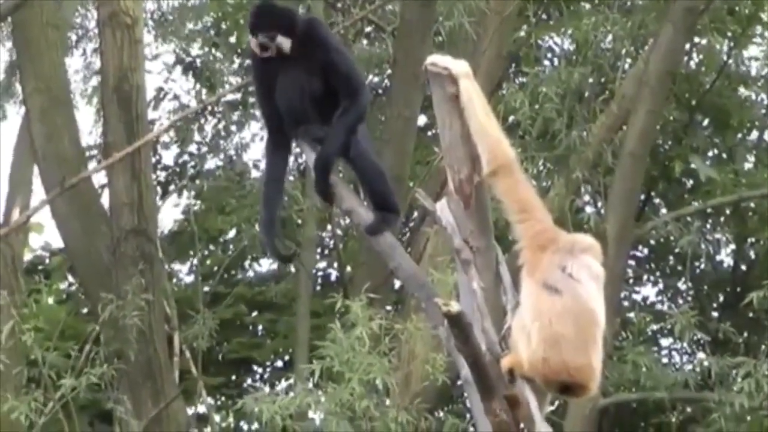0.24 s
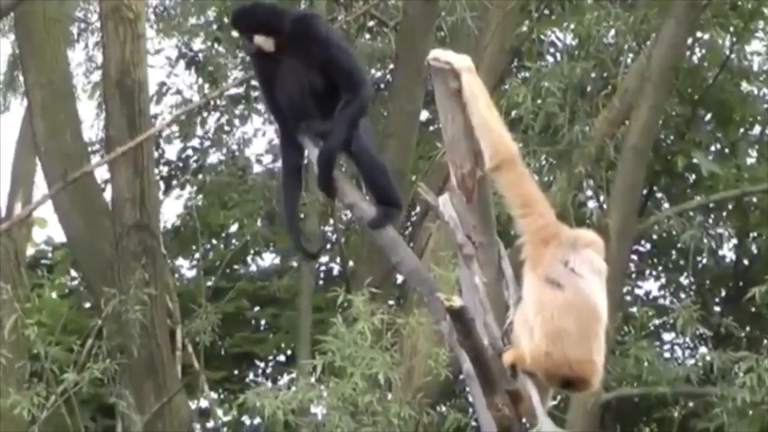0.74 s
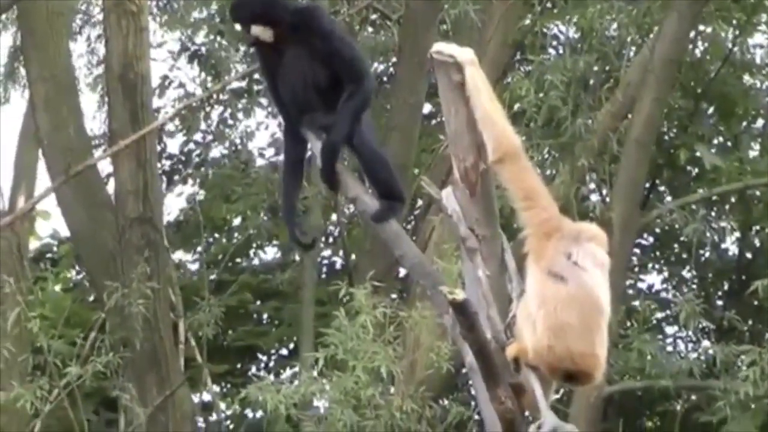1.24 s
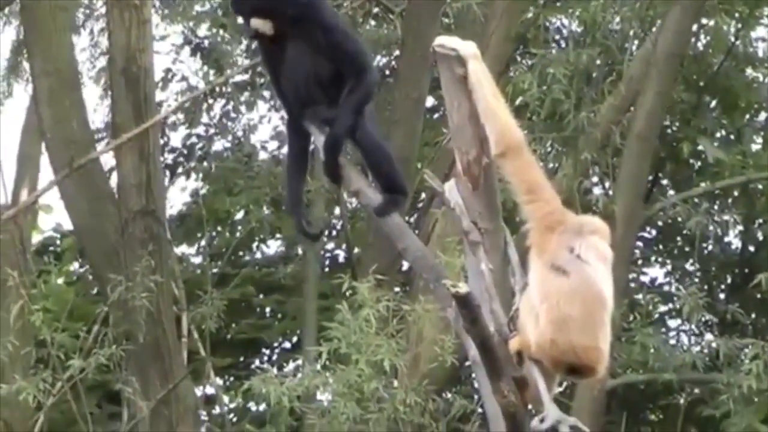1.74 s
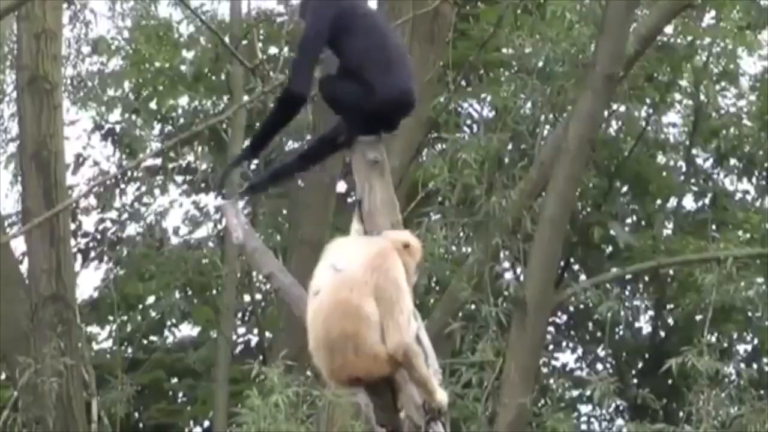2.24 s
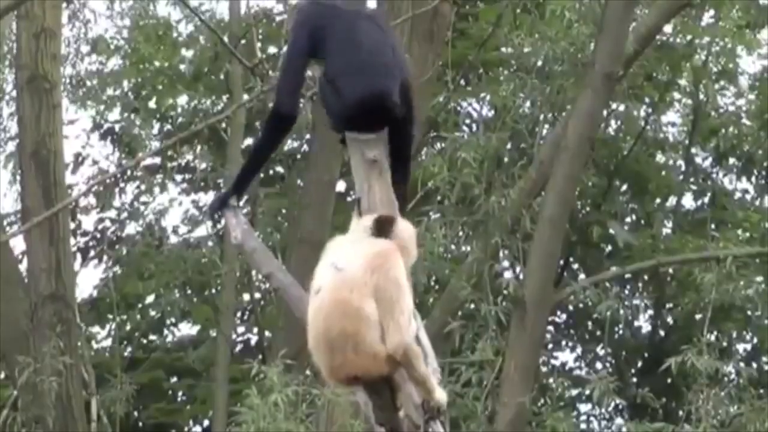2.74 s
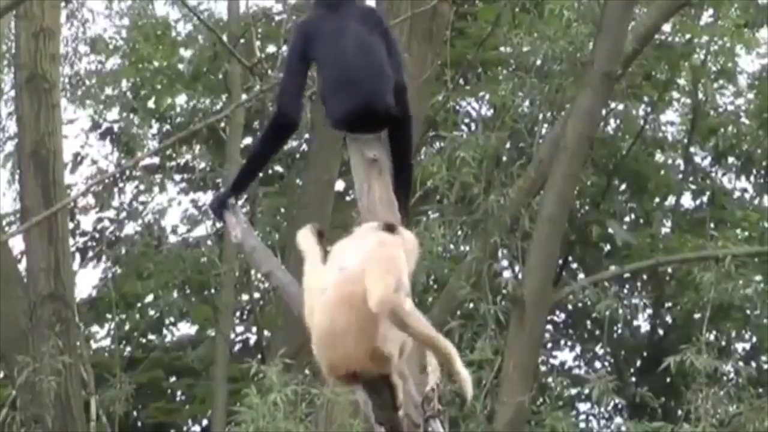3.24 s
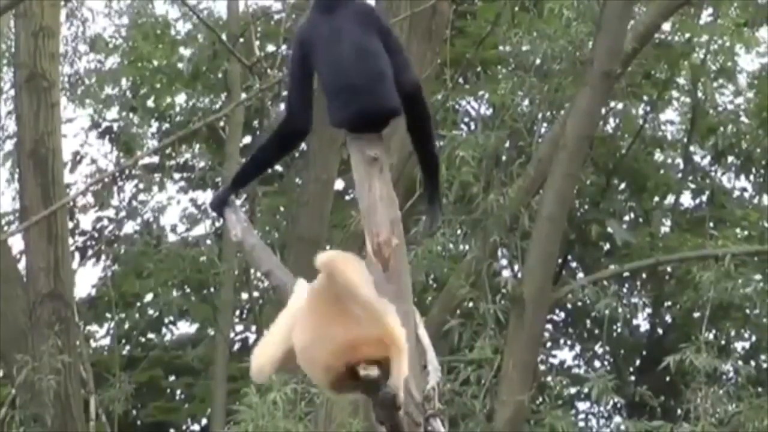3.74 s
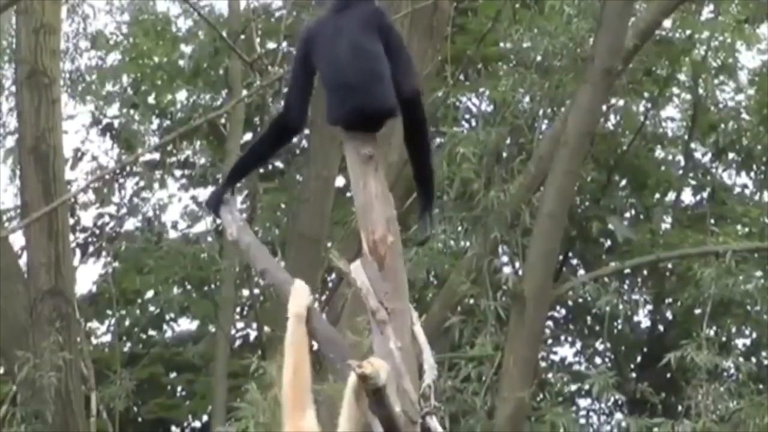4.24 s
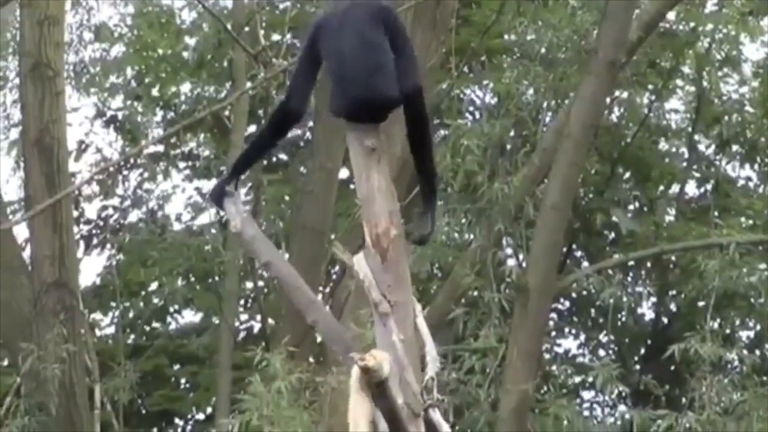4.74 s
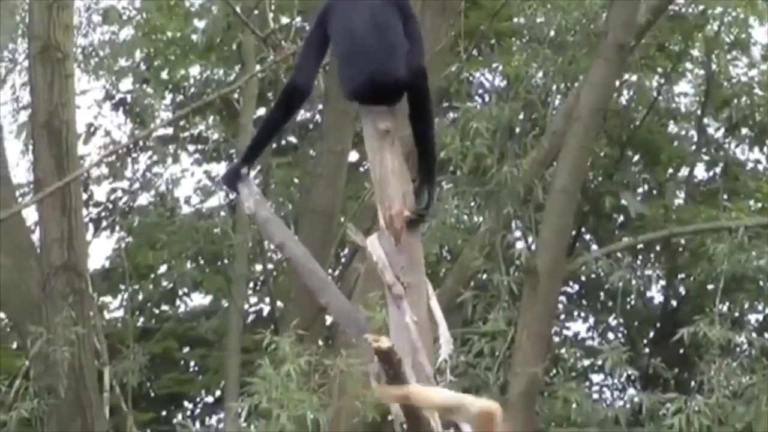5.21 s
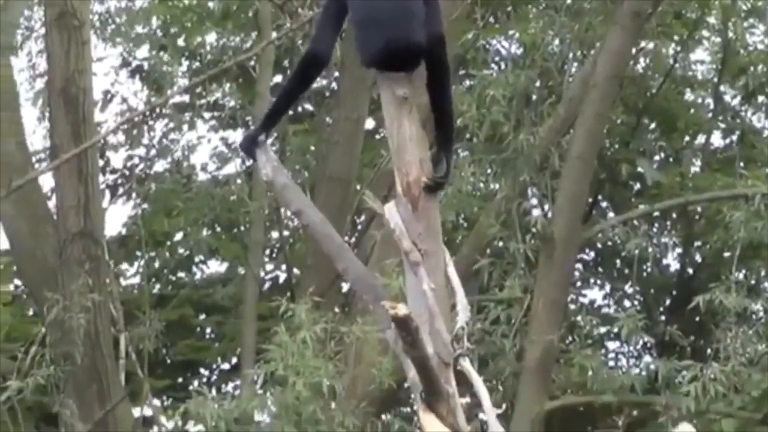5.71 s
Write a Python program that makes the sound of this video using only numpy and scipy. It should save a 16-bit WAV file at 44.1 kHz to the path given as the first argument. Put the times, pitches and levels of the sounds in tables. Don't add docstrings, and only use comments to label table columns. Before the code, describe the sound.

In a wooded outdoor enclosure, a high gibbon finishes one whistled note, slides up through another, then pauses. A thin bird trill buzzes past, branches knock and crack, leaves rustle. A long swelling note follows, droops and flips abruptly upward. A last steady note joins a low rising whoop. Motor hum, leaf hiss and light wind lie behind, heard by a handheld stereo camera microphone.

```python
import sys
import numpy as np
from scipy import signal
from scipy.fft import rfft, irfft
from scipy.io import wavfile
from scipy.ndimage import uniform_filter1d

SR = 44100
rng = np.random.default_rng(int(sys.argv[2]) if len(sys.argv) > 2 else 0)


def dump_mix(stems):
    frames = np.atleast_2d(stems).T
    limited = np.clip(frames, -1, 1)
    pcm = np.round(limited * 32767).astype(np.int16)
    wavfile.write(sys.argv[1], SR, pcm)


def attenuation_scalar(level_db):
    decades = np.asarray(level_db, float) / 20
    return 10 ** decades


N = 263277
LEAD_S = .4
T = np.arange(-int(LEAD_S * SR), N) / SR

# time in seconds, gain in dB.
BACKGROUND_SWELL = [
    (0.0, -6.5),
    (0.15, -3),
    (0.4, 1.3),
    (1.6, 0.4),
    (3.1, 2.7),
    (3.7, 1.4),
    (4.5, -5),
    (4.75, -5.5),
    (5.4, 1.2),
    (5.97, 1),
]


def colour(points, hz):
    p = np.array(points)
    return attenuation_scalar(np.interp(np.log(np.maximum(hz, 1)), np.log(p[:, 0]), p[:, 1]))


def curve(points):
    s, *cols = np.transpose(points)
    return np.array([np.interp(T, s, c) for c in cols])


def tent(s, half_s):
    return np.clip(1 - abs(T - s) / half_s, 0, 1)


def gate(start, end, fade_s=0.0029):
    opening = np.clip((T - start) / fade_s, 0, 1)
    closing = np.clip((end + fade_s - T) / fade_s, 0, 1)
    return opening * closing


def walk(rate):
    steps = rng.standard_normal(int(len(T) / SR * 60) + 2)
    w = np.interp(T - T[0], np.arange(len(steps)) / rate, steps)
    w = uniform_filter1d(w, int(SR / rate))
    return w / w.std()


def band(x, lo_hz, hi_hz):
    sos = signal.butter(2, [lo_hz, min(hi_hz, .45 * SR)], "band", fs=SR, output="sos")
    return signal.sosfilt(sos, x)


def wind():
    # gust centre in seconds, peak level in dB, half width in seconds.
    gusts = [
        (0.63, -60, 0.37),
        (1.15, -74, .15),
        (3.76, -76, .15),
        (4.08, -57.5, .2),
        (4.87, -62.5, 0.33),
        (5.45, -56, 0.16),
        (5.92, -63, 0.28),
    ]
    calm_db = -86
    puff = band(rng.standard_normal((2, len(T))), 12, 42)
    gust_db = np.max([(db - calm_db) * tent(s, half_s) for s, db, half_s in gusts], axis=0)
    return puff / puff.std() * attenuation_scalar(calm_db + gust_db + 10.0 + 5.8 * walk(2.4))


def motor(hz=70.23):
    # multiple of the motor rate, level in dB.
    multiples = [
        (1, 2),
        (3, -4),
        (4, -3.5),
    ]
    # time in seconds, motor load in dB.
    load = [(0.0, 1.7), (0.95, 1), (1.96, 0.5), (2.06, -3), (3.11, -6.5), (3.3, -1), (3.6, -2), (3.8, -6),
            (4.4, -7), (4.85, -5), (5.3, -2.5), (5.45, -13), (5.97, -7)]
    hum_db, octave_db, octave_per_load = -54.5, -75.5, 1.44
    gain_db, load_db = curve(BACKGROUND_SWELL)[0], curve(load)[0]
    phase = 2 * np.pi * np.cumsum(hz * (1 + 0.0057 * walk(4))) / SR
    tones = sum(attenuation_scalar(g + walk(7)) * np.sin(k * phase) for k, g in multiples)
    hum = attenuation_scalar(hum_db + gain_db + load_db - 3.0) * tones
    octave_level_db = octave_db + gain_db - octave_per_load * load_db + 3.5 * walk(2.4)
    hum += attenuation_scalar(octave_level_db) * np.sin(2 * phase)
    return hum * attenuation_scalar(np.array([[1.3], [-1.3]]))


def wood():
    # frequency in Hz, density in dB per Hz.
    rumble = [(26, -37.5), (45, -24), (70, -14.5), (162, -19.5), (210, -10), (246, -18.5), (280, -11),
              (712, -16), (909, -25), (1400, -22.5), (1820, -20), (3080, -120)]
    # frequency in Hz, density in dB per Hz.
    leaves = [(700, -23), (1300, -9.5), (2100, 2.5), (2900, 0.5), (3700, -7), (4400, -1), (5300, 2),
              (6300, -5), (7200, -10), (8600, -9.5), (9800, -4), (12000, -10.5), (15000, -9.5)]
    # frequency in Hz, side minus mid in dB.
    wood_side = [(60, -7), (110, -15), (200, -10.5), (380, -19.5), (690, -11), (1270, -2.5), (2340, -7),
                 (4320, -14), (7960, -26), (14700, -38.5)]
    # frequency in Hz, left minus right in dB.
    wood_lean = [(60, 4.5), (110, 3), (200, 3), (380, 1.5), (690, 1), (1270, -1), (2340, -0.5), (4320, -1),
                 (7960, 3), (14700, -4)]
    rumble_db, hiss_db, hiss_follows = -53.5, -69, 0.53
    gain_db = curve(BACKGROUND_SWELL)[0]
    low_db = rumble_db + gain_db
    high_db = hiss_db + hiss_follows * gain_db

    hz = np.fft.rfftfreq(len(T), 1 / SR)
    spectrum = np.hypot(colour(rumble, hz), attenuation_scalar(-19.0) * colour(leaves, hz))
    mid, side = rfft(rng.standard_normal((2, len(T)))) * spectrum
    side = side * colour(wood_side, hz)
    lean = np.sqrt(colour(wood_lean, hz))
    pair = np.array([(mid + side) * lean, (mid - side) / lean])

    out = 0
    for octave in range(10):
        centre = 25 * 2. ** octave
        slot = np.clip(1 - abs(np.log2(np.maximum(hz, 1) / centre)), 0, 1)
        hiss_share = np.clip(np.log2(centre / 400) / 2.73, 0, 1)
        db = (1 - hiss_share) * low_db + hiss_share * (high_db + 8.5)
        flicker_db = .6 * walk(6) + .7 * walk(25)
        out = out + attenuation_scalar(db + flicker_db) * irfft(pair * slot, len(T))
    return out * attenuation_scalar(28)


def bird(trill_hz=45, depth=.065):
    # swell centre in seconds, peak level in dB.
    swells = [
        (1.285, -64),
        (1.33, -60),
        (1.475, -57.5),
        (1.609, -59),
        (1.69, -67),
    ]
    start, end = 1.26, 1.75
    top_hz, slide_in_hz, slide_out_hz, slide_s = 7900, 1000, 400, .065
    fade_db_per_s = 300
    hz = top_hz - slide_in_hz * tent(start, slide_s) - slide_out_hz * tent(end, slide_s)
    db = np.max([peak_db - fade_db_per_s * abs(T - s) for s, peak_db in swells], axis=0)
    beat = np.sin(2 * np.pi * trill_hz * T + 1.7 * walk(26))
    swoop = hz * (1.015 - depth * ((1 + beat) / 2) ** 2 + 0.0096 * walk(60))
    return gate(start, end) * attenuation_scalar(db - beat) * np.sin(2 * np.pi * np.cumsum(swoop) / SR)


def branches():
    # start in seconds, peak level in dB, centre frequency in Hz.
    ticks = [
        (1.1694, -50, 1500),
        (2.111, -56, 2300),
        (2.6697, -48, 2310),
        (3.09, -42.5, 5110),
        (3.1176, -32, 1990),
        (3.1376, -45, 5300),
        (3.4697, -42, 1620),
    ]
    # start in seconds, peak level in dB, ring frequency in Hz.
    knocks = [
        (2.039, -55, 1060),
        (3.018, -70, 450),
        (3.047, -43, 420),
        (3.28, -50, 377),
    ]
    # start in seconds, peak level in dB, ring frequency in Hz.
    chip = (.4, -54, 5500)
    out, t = np.zeros(len(T)), np.arange(2000) / SR
    for s, db, hz in ticks:
        decay = np.exp(-t / .0006) + .25 * np.exp(-t / .004)
        burst = band(rng.standard_normal(len(t)) * decay, hz / 3, hz * 2.5)
        i = int((s - T[0]) * SR)
        out[i:i + len(t)] += attenuation_scalar(db) * burst / abs(burst).max()
    for s, db, hz in [*knocks, chip]:
        i = int((s - T[0]) * SR)
        swell = (t / 0.0051) * np.exp(1 - t / 0.0051)
        out[i:i + len(t)] += attenuation_scalar(db) * swell * np.sin(2 * np.pi * hz * t)
    return out


def rustle():
    # start in seconds, level in dB, fade in seconds.
    shakes = [
        (3.12, -68, .05),
        (3.462, -53.5, 0.11),
        (3.59, -66, .05),
    ]
    shake = 0
    for s, db, fade_s in shakes:
        onset = np.clip((T - s) / .012, 0, 1)
        shake = shake + attenuation_scalar(db) * onset * np.exp(-np.maximum(T - s, 0) / fade_s)
    grain = attenuation_scalar(2.5 * walk(80))
    return shake * grain * band(rng.standard_normal(len(T)), 4200, 13000)


def trunks(x, rise_s=0.0019, t60_low=0.93, t60_mid=0.45, t60_high=0.68, side_db=-8.0):
    t = np.arange(int(1.3 * SR)) / SR
    first_s = .036
    rise = np.clip((t - first_s) / rise_s, 0, 1)
    noise = rng.standard_normal((2, len(t)))
    low = band(noise, 140, 1640) * attenuation_scalar(-60 * t / t60_low)
    middle = band(noise, 2790, 2800) * attenuation_scalar(-60 * t / t60_mid + 8.0)
    high = np.clip(t / 0.021, 0, 1) * band(noise, 3300, 10400) * attenuation_scalar(-60 * t / t60_high + 10.5)
    rise += 0.97 * np.exp(-((t - .042) / 0.003) ** 2)
    rise += 0.85 * np.exp(-((t - .075) / 0.0095) ** 2)
    cloud = low * rise + middle * rise + high
    mid, side = cloud / np.sqrt(SR * 0.059) * [[1], [attenuation_scalar(side_db)]]
    side = band(side, 100, 3500)
    return signal.fftconvolve(x[None], [mid + side, mid - side], axes=1)[:, :len(x)]


def limbs(x, fade_s=0.021):
    t = np.arange(1200) / SR
    shape = np.clip(t / 0.0028, 0, 1) * np.exp(-t / fade_s) / np.sqrt(SR * 0.0057)
    mid, side = rng.standard_normal((2, len(t))) * shape
    side = 0.43 * band(side, 200, 3000)
    return signal.fftconvolve(x[None], [mid + side, mid - side], axes=1)[:, :len(x)]


def whoop():
    # time in seconds, pitch in Hz, level in dB.
    glide = [
        (5.45, 409.4, -68),
        (5.48, 414, -58),
        (5.6, 435.5, -57.5),
        (5.681, 423, -44.5),
        (5.76, 501.4, -51.5),
        (5.854, 595, -36),
        (5.97, 679, -39.5),
    ]
    s, hz, db = np.transpose(glide)
    smooth_hz = uniform_filter1d(np.interp(T, s, hz), size=1500)
    phase = 2 * np.pi * np.cumsum(smooth_hz) / SR
    level = attenuation_scalar(np.interp(T, s, db) + 2.5) * gate(s[0], s[-1])
    return level * (np.sin(phase) + attenuation_scalar(-36.0) * np.sin(2 * phase))


def pitch():
    # time in seconds, pitch in Hz.
    pitch_first = [(0, 1486), (.04, 1497), (.07, 1530), (.1, 1600), (.13, 1670), (.16, 1680), (.21, 1660)]
    pitch_rise = [(.41, 1190), (.44, 1250), (.47, 1300), (.5, 1328), (.55, 1318), (.67, 1352), (.72, 1418),
                  (.76, 1490), (.83, 1650)]
    pitch_blip = [(2.18, 1530), (2.23, 1546), (2.252, 1570), (2.265, 1700), (2.3, 1800)]
    pitch_hold = [(3.36, 1520), (3.42, 1590), (3.5, 1610), (3.55, 1650), (3.7, 1706), (3.91, 1742),
                  (4.09, 1713), (4.17, 1726), (4.3, 1723)]
    pitch_last = [(5.39, 1190), (5.41, 1240), (5.44, 1310), (5.48, 1328), (5.59, 1316), (5.69, 1322),
                  (5.84, 1321), (5.97, 1350)]
    droop_hz_per_s = 380
    sag_at_s, sag_from_hz, rest_hz, sag_s = 4.42, 1683, 850, .344
    leap_at_s, leap_s, leap_top_hz = 5.08, .009, 3300
    hz = curve(pitch_first + pitch_rise + pitch_blip + pitch_hold + pitch_last)[0]
    held_s, held_hz = pitch_hold[-1]
    sag = rest_hz + (sag_from_hz - rest_hz) * np.exp(-(T - sag_at_s) / sag_s)
    sag = np.minimum(sag, held_hz - droop_hz_per_s * (T - held_s))
    leap_share = .5 + .5 * np.tanh((T - leap_at_s) / leap_s / 2)
    leap = sag * (leap_top_hz / sag) ** leap_share
    in_fall = (T > held_s) & (T < pitch_last[0][0] - .1)
    return uniform_filter1d(np.where(in_fall, leap, hz), size=400)


def gibbon(note, phase, hz, tilt_db, third_db, fifth_db, octave_db, beam=1.4, muffle_db=1.6):
    # time in seconds, turned left in dB, turned to the microphone in dB.
    head = [(.016, 5.5, 4), (.08, 5, 4.5), (.2, 5, -30), (.44, -1, 3.2), (.52, -5.5, 5.3), (.62, -5, 6.8),
            (.72, 3, 0.8), (2.24, 7, 2), (3.5, -4, 0.9), (3.7, 5.5, 0), (4.4, 7.5, -1.8), (4.5, 3.5, -1),
            (4.93, -2, -4.5), (5.052, 3, 3), (5.078, 0.1, -7.5), (5.41, 3, 0.6), (5.8, 20, -2.9),
            (5.88, -11.5, 2.1)]
    # centre in seconds, depth in dB, half width in seconds.
    fades = [(3.52, 25, 0.017), (4.4, 16, 0.0079), (2.7, -3, 0.013), (3.734, 10, 0.033), (3.82, 6.5, 0.047),
             (3.885, 1.5, 0.039), (4.0, -2.5, .035), (4.04, 7, .02), (2.7, -2.5, 0.077),
             (3.595, -4.5, 0.026), (5.8, -6, 0.0063), (4.073, 16, 0.029), (4.29, 9, 0.011),
             (4.368, 11, 0.015), (4.41, 11, .02), (4.7, -6, 0.061), (.72, 6, 0.008), (5.47, 3, 0.023),
             (4.503, 8, 0.036), (5.883, 11, 0.054)]
    # frequency in Hz, gain in dB.
    throat = [(2800, -30), (3500, -19), (4200, -9.5), (5200, -6), (6000, -11), (6700, -14.5), (7900, -15.5),
              (9200, -17), (10400, -18.5), (12000, -23.5), (14000, -30), (15500, -37)]
    # frequency in Hz, gain in dB.
    octave_throat = [(2000, 0.5), (2300, -5.5), (2650, -12.5), (2900, -23.5), (3100, -25.5), (3450, -27),
                     (4000, -65)]
    mouth_on_octave = .2
    top_loss_db = 9

    moves = np.vstack([curve(note), curve(head)])
    effort_db, mouth_db, pan_db, face_db = uniform_filter1d(moves, size=200)
    one_db = effort_db - sum(db * tent(s, half_s) for s, db, half_s in fades)
    two_db = effort_db + octave_db + mouth_on_octave * (mouth_db + 10)
    top_db = effort_db + mouth_db
    start = note[0][0] if note[0][0] > .1 else -.25
    shut = gate(start, note[-1][0]) * np.sqrt(2)
    speed = np.clip(abs(np.gradient(hz)) / .5, 0, 1)
    crack_db = 6 * speed * np.sin(2 * np.pi * 60 * T) ** 2

    low = shut * attenuation_scalar(one_db) * np.sin(phase)
    top = attenuation_scalar(two_db) * (1 + 0.22 * walk(30)) * colour(octave_throat, 2 * hz) * np.sin(2 * phase)
    slope_db = tilt_db - muffle_db * np.clip((1300 - hz) / 230, 0, 1)
    for k in range(3, 11):
        db = top_db + slope_db * (k - 4.5)
        db = db + third_db * (k == 3) + fifth_db * (k == 5) - top_loss_db * (k > 7)
        flutter = 1 + 0.3 * walk(45)
        top += attenuation_scalar(db) * flutter * colour(throat, k * hz) * np.sin(k * phase)
    top *= shut

    pan = np.array([pan_db, -pan_db]) / 2
    heard_low = low * attenuation_scalar(face_db + pan - crack_db)
    heard_top = top * attenuation_scalar(beam * face_db + 0.2 * pan)
    return low + top, heard_low + heard_top


def scene():
    # time in seconds, effort in dB, mouth opening in dB (overtones against the fundamental).
    note_first = [
        (0.016, -26, -16.5),
        (0.038, -25, -19),
        (0.072, -32.5, -7.5),
        (0.14, -27.5, -36),
        (0.2, -64, -25),
    ]
    note_rise = [(0.42, -41.5, -27), (0.437, -27, -22), (0.468, -39.5, -13.5), (0.522, -42, -3.5),
                 (0.6, -38.5, -8.5), (0.664, -33, -17), (0.69, -24, -20), (0.746, -22, -47),
                 (0.821, -44, -27)]
    note_blip = [
        (2.195, -58, -24),
        (2.209, -38.5, -44),
        (2.245, -37.5, -39),
        (2.275, -56, -25),
    ]
    note_hold = [(3.37, -54, -17), (3.41, -50.5, -32), (3.49, -34, -32), (3.61, -33, -30),
                 (3.704, -22.5, -28), (3.94, -21, -21), (4.04, -23.5, -18), (4.12, -19, -26.5),
                 (4.24, -30, -16)]
    note_fall = [(4.335, -23, -23), (4.44, -25.5, -22.5), (4.53, -22.5, -21.5), (4.6, -27, -23.5),
                 (4.69, -29.5, -26), (4.76, -28.5, -16.5), (4.9, -23, -21.5), (4.97, -29, -17.5),
                 (5.024, -35.5, -8)]
    note_leap = [
        (5.044, -32.5, -32),
        (5.067, -23.5, -56),
        (5.09, -28, -60),
        (5.102, -49, -15),
    ]
    note_last = [(5.395, -41.5, -39), (5.411, -22.5, -30), (5.44, -39, -22), (5.513, -29.5, -14),
                 (5.577, -25.5, -36.5), (5.7, -30.5, -10.5), (5.815, -27, -21), (5.913, -24, -23.5),
                 (5.97, -31, -22)]
    # overtone tilt in dB per step, third overtone in dB,
    # fifth overtone in dB, octave in dB.
    voices = [
        (1.6, 0.5, -10, -13.5),
        (-1.5, -11, -9, 6),
        (-1.5, -3, -1.5, 11),
        (-0.1, 5.25, -1.5, -6),
        (-1.8, -0.5, -7.5, 1),
    ]
    hz = pitch()
    phase = 2 * np.pi * np.cumsum(hz * (1 + 0.00083 * walk(30))) / SR
    notes = (note_first, note_rise, note_blip, note_hold + note_fall + note_leap, note_last)
    songs = [gibbon(note, phase, hz, *voice) for note, voice in zip(notes, voices)]
    mouth = sum(mono for mono, _ in songs)
    low, far, wood_hits = whoop(), bird(), branches() + rustle()
    direct = attenuation_scalar(-2.5) * sum(pair for _, pair in songs) + low + far + wood_hits
    sent = attenuation_scalar(-8.0) * mouth + attenuation_scalar(-10.0) * low + attenuation_scalar(-3) * far + attenuation_scalar(-29.0) * wood_hits
    scatter = trunks(sent) + attenuation_scalar(-11.5) * limbs(mouth)
    return (direct + scatter + wood() + motor() + wind())[:, -N:]


def top_cut(x):
    return signal.sosfilt(signal.butter(12, 15260, fs=SR, output="sos"), x)


def record(dry):
    cut = signal.ellip(8, .2, 60, 14900, fs=SR, output="sos")
    mix = signal.sosfilt(cut, dry)
    return top_cut(mix)


dry = scene()
out = record(dry)
dump_mix(out)
```